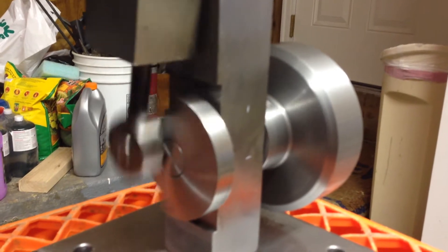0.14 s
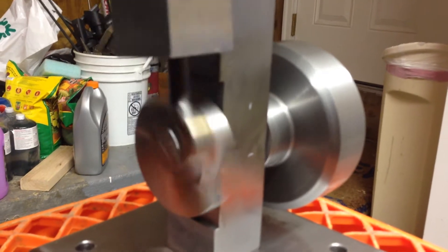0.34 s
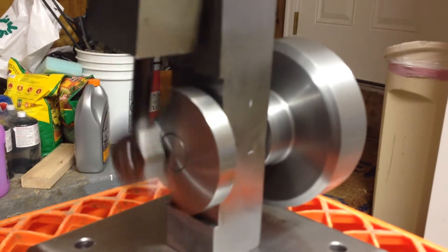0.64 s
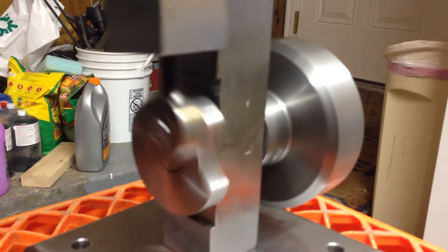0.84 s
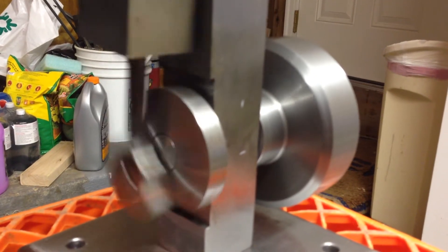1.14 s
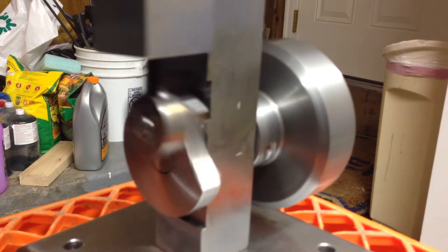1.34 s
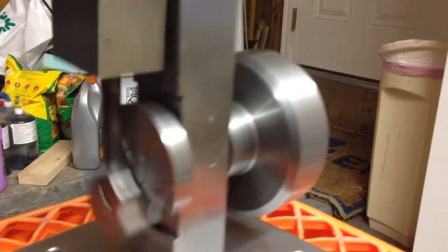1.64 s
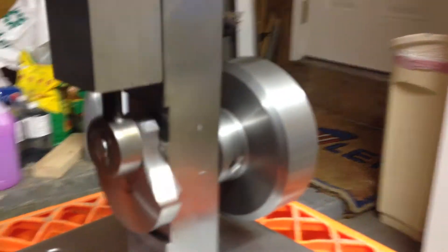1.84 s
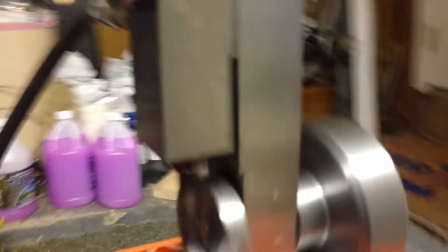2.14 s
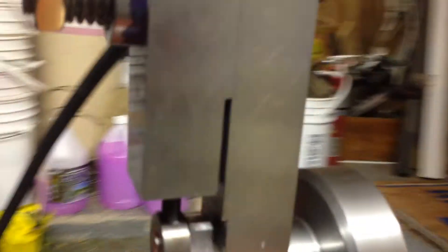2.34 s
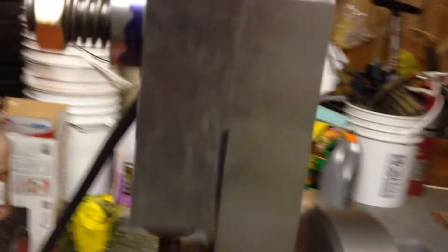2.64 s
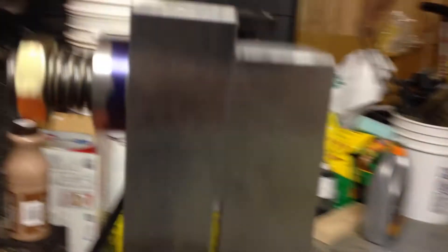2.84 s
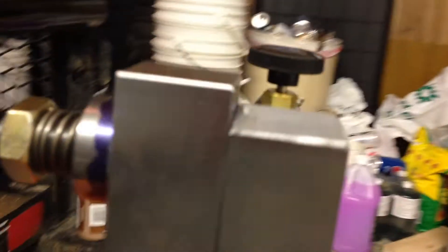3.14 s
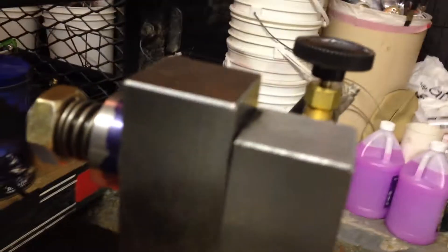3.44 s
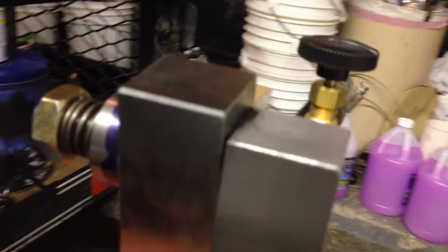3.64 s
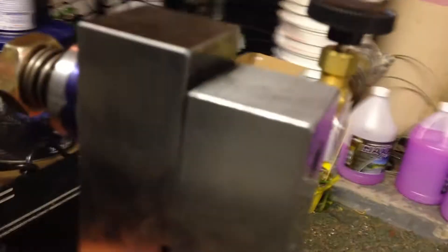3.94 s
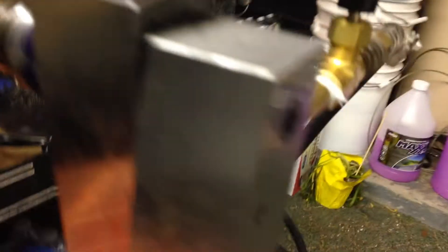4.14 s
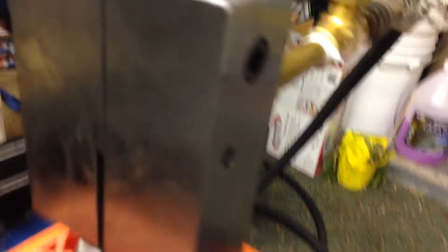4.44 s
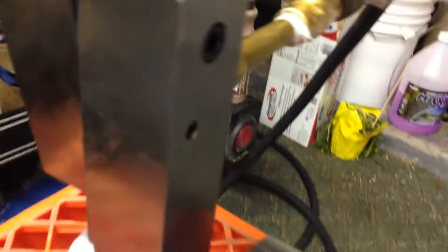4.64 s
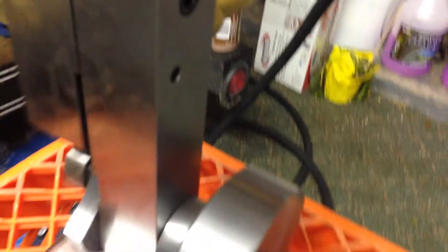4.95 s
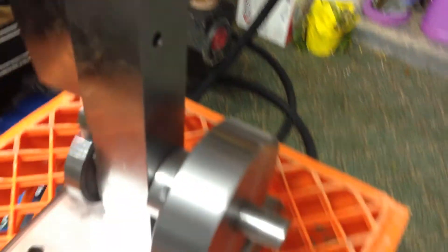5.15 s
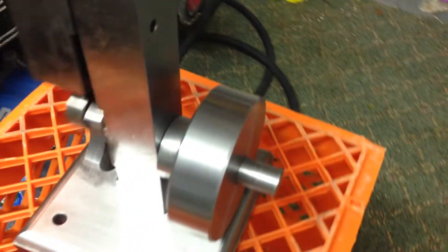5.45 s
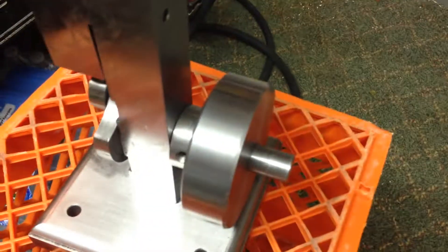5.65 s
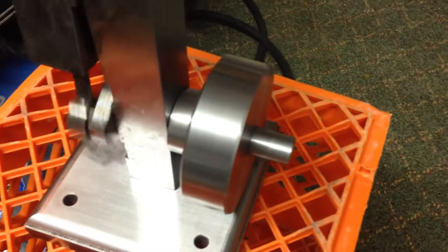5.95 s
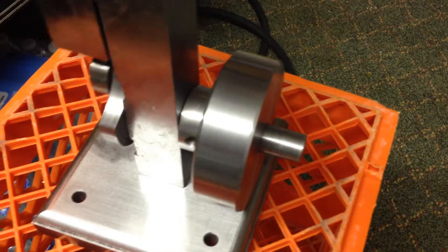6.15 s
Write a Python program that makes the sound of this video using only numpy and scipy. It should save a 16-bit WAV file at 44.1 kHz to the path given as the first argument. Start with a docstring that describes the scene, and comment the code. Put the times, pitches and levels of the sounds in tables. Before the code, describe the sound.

Bright, quick puffs of exhaust come in pairs from a small single-cylinder engine, one crisp and one hissier, about four puffs a second without a break. Its loose bearing ticks and knocks lightly between them. In the second half the pace eases slightly and the metal sounds recede as the close microphone moves around the machine. The workshop adds a brief echo, quiet rumble and a faint hum.

```python
"""Oscillating-cylinder engine idling in a workshop.

About two turns a second, slowing a little and unevenly. Each turn exhausts twice through a narrow
port: a short sharp puff, then a longer hissing one. Play in the crank bearing ticks before the sharp
puff and knocks after it. A close microphone moves around the engine; the shop echoes, rumbles and hums."""
import sys
import numpy as np
from scipy import signal
from scipy.fft import rfft, irfft, next_fast_len
from scipy.io import wavfile
from scipy.ndimage import uniform_filter1d

SR = 44100
rng = np.random.default_rng(int(sys.argv[2]) if len(sys.argv) > 2 else 0)


def generate_wav(signal):
    """Clip the signal to [-1, 1] and save it as 16-bit WAV at the path in sys.argv[1]."""
    frames = np.transpose(np.atleast_2d(signal))
    scaled = np.clip(frames, -1, 1) * 32767
    pcm = np.round(scaled).astype(np.int16)
    wavfile.write(sys.argv[1], SR, pcm)


N = 278251

# crank turns: sharp_start_s, long_start_s, sharp_db, sharp_bright_db, long_db, long_bright_db, clatter_db
CRANK_TURNS = [(-0.191, -0.002, -22, 0, -24.5, 0, -38), (0.2954, 0.4824, -22.5, 0.5, -24.5, 0.5, -35),
               (0.7727, 0.96, -21.5, -2.5, -24.5, 1.3, -38.5), (1.2487, 1.4385, -22, 0, -24.5, 2, -38),
               (1.7356, 1.9256, -21, -2.5, -23, -0.5, -36), (2.2219, 2.4091, -22, -1, -19.5, -4, -35.5),
               (2.702, 2.8922, -22, 1, -19.5, -2.5, -40), (3.1924, 3.3932, -20.5, -0.5, -22.5, 0.8, -39.5),
               (3.7563, 3.9538, -22, 1, -20.5, -0.8, -36), (4.2996, 4.4908, -20.5, 0.5, -24.5, 4.5, -35),
               (4.8081, 5.004, -22.5, 0.5, -24, 0.6, -42), (5.3422, 5.5436, -25, 1.5, -24.5, 2.5, -41),
               (5.9335, 6.1301, -25, 1.1, -23.5, 0, -42)]
# sharp puff duration: time_s, length_s
SHARP_PUFF_LENGTH = [(0, 0.0172), (2.2, 0.02), (3.2, 0.0142), (4.3, 0.0145), (6, 0.018)]
# top treble as the microphone enters the sharp puff's beam: time_s, gain_db
SHARP_BEAM = [(0, -1.6), (2.2, -3), (3.2, -1.5), (4.2, 1.5), (6, 0.2)]
# jet noise: freq_hz, density_db
SHARP_JET_SPECTRUM = [(100, -34.5), (400, -26), (800, -18), (1450, -11), (2150, 0.5), (3000, -3),
                      (5000, -3.5), (8500, -5), (11500, -2.5), (13300, -4.5), (15200, 0.5)]
LONG_JET_SPECTRUM = [(100, -44.5), (400, -22.5), (900, -17.5), (1400, -7.5), (2000, 1.5), (3000, -3),
                     (5000, -0.5), (7500, -3), (9000, -11.5), (11500, -10.5), (13300, -15), (15200, -8.5)]
# odd quarter-wave resonances of the bore: centre_hz, width_hz, lift_db
SHARP_BORE_MODES = [(2184, 760, 6.5), (6460, 1700, 11), (10490, 1700, 11), (14500, 650, 4.5)]
LONG_BORE_MODES = [(2283, 970, 6.73), (6176, 780, 13.05), (10640, 1420, 14.16), (14800, 800, 4)]
# bore resonances as the flow dies: centre_hz, width_hz, level_db
SINGING_MODES = [(2090, 110, -2.5), (6310, 230, -3)]
# frame and crank modes: pitch_hz, t60_s, knock_db, tick_db
METAL_MODES = [(832, 0.11, -16.5, -8.5), (1130, 0.091, -26.5, -9.5), (1316, 0.074, -16.5, -7.5),
               (1640, 0.017, -8, -17), (2540, 0.018, -8.5, -14), (3300, 0.045, -12.5, -12),
               (4460, 0.0047, -5.5, 2.5), (6800, .014, -8.5, -12), (7690, 0.0079, -3, -18)]
# contacts in a knock: delay_s, level_db
KNOCK_CONTACTS = [(0, -1), (.005, -5), (.0095, -9.5)]
# microphone leaving the crank: time_s, gain_db
CRANK_PROXIMITY = [(0, 1), (2.4, -0.5), (3.3, -3.5), (6.31, -6)]
# thin spits, dull bump, soft low thump: start_s, level_db
SPIT_EVENTS = [(0.154, -37), (1.111, -38), (3.7025, -35), (4.205, -39)]
BUMP_EVENTS = [(2.051, -32.5)]
THUMP_EVENTS = [(3.904, -46.5)]
# contact and friction noise: freq_hz, density_db
SNAP_SPECTRUM = [(1000, -28), (3300, -12), (4400, 3.5), (5600, -6), (7000, -1.5), (8400, 0),
                 (9500, -17), (15000, -36)]
KNOCK_SPECTRUM = [(100, -14), (600, 8.5), (1200, 3), (8300, -1), (9500, -18.5), (15000, -28)]
CLATTER_SPECTRUM = [(60, -15), (250, -10), (400, 1), (600, 5.5), (800, -5), (1100, -9.5), (2000, -43.5)]
TICK_SPECTRUM = [(100, -14), (600, 10), (8000, -2.5), (11000, -19.5), (15000, -29)]
SPIT_SPECTRUM = [(2000, -12.5), (7000, 1.5), (10000, 4), (15000, -8)]
BUMP_SPECTRUM = [(60, 7), (600, 12), (1300, 1), (3000, -18), (10000, -45)]
THUMP_SPECTRUM = [(60, -19), (120, -2), (160, -7), (260, -26), (1000, -52)]
RUB_SPECTRUM = [(100, -12.5), (220, -9.5), (450, -9.5), (850, 2.5), (1400, -13.5), (2500, -16.5),
                (10000, -23)]
SHUDDER_SPECTRUM = [(30, -13), (70, -2), (140, -0.5), (240, -5), (500, -8), (2000, -54.5)]
# shop decay: freq_hz, t60_s
SHOP_DECAY = [(200, 0.87), (1300, .42), (2150, 0.46), (3200, 0.41), (5200, 0.35), (6300, 0.41), (7800, .36),
              (10500, 0.3), (15000, 0.24)]
# reverb tail as the microphone moves: time_s, gain_db
REVERB_LEVEL = [(0, -17), (2.5, -20), (3.7, -23.5), (6.31, -25)]
# room rumble: freq_hz, density_db
RUMBLE_SPECTRUM = [(20, -33), (35, -20), (50, -4), (72, 4), (100, -6.5), (220, -0.5), (350, -7.5),
                   (800, -13.5), (1500, -14.5), (5000, -14.5), (15000, -22.5)]
# rumble and hum envelopes: time_s, level_db
RUMBLE_LEVEL = [(0, -71), (1.35, -68.5), (3.2, -68), (3.6, -71.5), (4.7, -74), (5.1, -78), (6.31, -73.5)]
HUM_LEVEL = [(0, -78.5), (1.4, -72.5), (2.5, -75), (4.5, -91.5)]

STROKE_S = 0.19  # sharp puff to long puff, at a brisk pace
LONG_PUFF_S, LONG_PUFF_EXPONENT = 0.029, 3.4  # at STROKE_S; power law in stroke time
KNOCK_DELAY_S, KNOCK_EXPONENT = 0.1035, 0.6  # likewise
TICK_LEAD_S = 0.064
KNOCK_BASE_DB, TICK_BASE_DB = -27, -39.5
RASP_SHARE, WHISTLE_SHARE = 0.87, 0.8  # of brightness, near 4 kHz and 6 kHz
TOP_HZ = 15400


def exhaust(puffs, flow_db, jet, bore, gain_db, flutter_db, bass_fade_db):
    """Each port opening releases a turbulent jet, coloured by the bore."""
    out, t = np.zeros(N), np.arange(-SR // 50, SR // 7) / SR
    hz = np.fft.rfftfreq(len(t), 1 / SR)
    lift_db = sum(db / (1 + (2 * (hz - centre_hz) / width_hz) ** 2) for centre_hz, width_hz, db in bore)
    colour = amp(at_hz(jet, hz) + lift_db)
    colour /= np.sqrt(np.mean(colour ** 2 * (hz < 4500)))
    for start_s, length_s, level_db, bright_db, top_db in puffs:
        # treble beams, so colour follows microphone position
        rasp_db, whistle_db = RASP_SHARE * bright_db, WHISTLE_SHARE * bright_db
        beam_db = at_hz([(2500, 0), (3100, rasp_db), (5000, rasp_db), (5800, whistle_db),
                         (7000, whistle_db), (9500, bright_db + top_db)], hz)
        air = irfft(rfft(rng.standard_normal(len(t))) * colour * amp(beam_db), len(t))
        # bass dies first as pressure falls
        bass = filtered(air, lambda f: 1 / (1 + (f / 1400) ** 6))
        air -= bass * (1 - amp(-bass_fade_db * np.maximum(t / length_s - 0.5, 0)))
        flutter = unit(uniform_filter1d(rng.standard_normal(len(t)), SR // 400))
        envelope = amp(level_db + gain_db + flow_db(t / length_s) + flutter_db * flutter)
        add(out, start_s + t[0], envelope * air)
    return out


def port_flow(rise_db, open_at, exponent, hold_until, fall_db, shut_at, shut_over, shut_db):
    """The port opens, pressure holds and drains, the port shuts to a leak. Time in puff lengths."""
    def flow_db(progress):
        opening = rise_db * np.maximum(open_at - progress, 0) ** exponent
        draining = fall_db * np.maximum(progress - hold_until, 0)
        shutting = shut_db * np.clip((progress - shut_at) / shut_over, 0, 1)
        return -opening - draining - shutting
    return flow_db


def sharp_puffs():
    """Quick-stroke exhausts: start_s, length_s, level_db, bright_db, top_db."""
    return [(start_s, at_time(SHARP_PUFF_LENGTH, start_s), db, bright_db, at_time(SHARP_BEAM, start_s))
            for start_s, _, db, bright_db, *_ in CRANK_TURNS]


def long_puffs():
    """Slow-stroke exhausts, same columns; a slower crank holds the port open longer."""
    return [(long_s, LONG_PUFF_S * ((long_s - sharp_s) / STROKE_S) ** LONG_PUFF_EXPONENT, db, bright_db, 0)
            for sharp_s, long_s, _, _, db, bright_db, _ in CRANK_TURNS]


def bore_singing(puffs, gain_db, peak_at, spread, rise):
    """The bore's lowest resonances swell late in a puff and creep upward. Time in puff lengths."""
    out, t = np.zeros(N), np.arange(SR // 6) / SR
    for start_s, length_s, level_db, *_ in puffs:
        past_peak = t / length_s - peak_at
        swell = amp(level_db + gain_db) * np.exp(-(past_peak / spread) ** 2) * (1 - np.exp(-t / 0.004))
        for hz, width_hz, mode_db in SINGING_MODES:
            drift = slow_noise(width_hz / 2, 2 * len(t)).reshape(2, -1)
            phase = 2 * np.pi * np.cumsum(hz * (1 + rise * past_peak)) / SR
            band = drift[0] * np.cos(phase) + drift[1] * np.sin(phase)
            add(out, start_s, amp(mode_db) * swell * band)
    return out


def knock_events():
    """The bearing takes up its play about midway between puffs: start_s, level_db, clatter_db."""
    return [(sharp_s + KNOCK_DELAY_S * ((long_s - sharp_s) / STROKE_S) ** KNOCK_EXPONENT,
             KNOCK_BASE_DB + at_time(CRANK_PROXIMITY, sharp_s), clatter_db)
            for sharp_s, long_s, *_, clatter_db in CRANK_TURNS]


def bearing_knocks(click_db, crack_db, snap_db, clatter_gain_db):
    """The crank pin lands with a hard snap and bounces twice; the stand clatters."""
    out, t = np.zeros(N), np.arange(SR // 5) / SR
    modes = [(hz, t60_s, db) for hz, t60_s, db, _ in METAL_MODES]
    for start_s, level_db, clatter_db in knock_events():
        snap = noise(SNAP_SPECTRUM, len(t)) * decay(t, t60_s=0.009)
        add(out, start_s, amp(level_db + snap_db) * snap)
        for delay_s, contact_db in KNOCK_CONTACTS:
            crack = amp(crack_db) * noise(KNOCK_SPECTRUM, len(t)) * decay(t, t60_s=0.018)
            click = amp(level_db + contact_db + click_db) * (metal_ring(modes, t) + crack)
            add(out, start_s + delay_s * rng.uniform(0.97, 1.0), click)
        clatter = noise(CLATTER_SPECTRUM, len(t)) * decay(t, t60_s=0.3) * (1 - np.exp(-t / 0.0017))
        add(out, start_s, amp(clatter_db + clatter_gain_db) * clatter)
    return out


def bearing_ticks(click_db, crack_db):
    """Before each sharp puff the play closes the other way, ringing the same metal more softly."""
    out, t = np.zeros(N), np.arange(SR // 4) / SR
    modes = [(hz, t60_s, db) for hz, t60_s, _, db in METAL_MODES]
    for sharp_s, *_ in CRANK_TURNS:
        crack = amp(crack_db) * noise(TICK_SPECTRUM, len(t)) * decay(t, t60_s=0.017)
        level_db = TICK_BASE_DB + at_time(CRANK_PROXIMITY, sharp_s) + click_db
        add(out, sharp_s - TICK_LEAD_S, amp(level_db) * (metal_ring(modes, t) + crack))
    return out


def metal_ring(modes, t):
    """Damped modes; random pitch and strength stand for the crank's position at each contact."""
    out = np.zeros(len(t))
    for hz, t60_s, level_db in modes:
        envelope = amp(level_db + rng.normal(0, 2)) * decay(t, t60_s)
        pitch_hz = hz * (1 + rng.normal(0, 0.025))
        out += envelope * np.sin(2 * np.pi * pitch_hz * t)
    return out


def hollow_ring(gain_db, start_hz, end_hz, glide_s, t60_s, attack_s):
    """Each knock wakes a rising hollow tone, as in a cylinder whose air space shrinks."""
    out, t = np.zeros(N), np.arange(SR // 5) / SR
    for start_s, _, clatter_db in knock_events():
        hz = (end_hz + (start_hz - end_hz) * np.exp(-t / glide_s)) * (1 + rng.normal(0, 0.02))
        tone = np.sin(2 * np.pi * np.cumsum(hz) / SR)
        envelope = (1 - np.exp(-t / attack_s)) ** 2 * decay(t, t60_s)
        add(out, start_s, amp(clatter_db + gain_db) * envelope * tone)
    return out


def small_contacts(events, spectrum, t60_s, gain_db):
    """Contacts without a ring: decaying noise bursts."""
    out, t = np.zeros(N), np.arange(SR // 10) / SR
    for start_s, level_db in events:
        add(out, start_s, amp(level_db + gain_db) * decay(t, t60_s) * noise(spectrum, len(t)))
    return out


def port_face_rub(level_db, lead_s, width_s):
    """The cylinder rubs its port face, most on the fast swing through the sharp puff."""
    t = np.arange(N) / SR
    speed = sum(np.exp(-((t - sharp_s + lead_s) / width_s) ** 2) for sharp_s, *_ in CRANK_TURNS)
    return amp(level_db + curve(CRANK_PROXIMITY)) * speed * noise(RUB_SPECTRUM, N)


def crate_shudder(level_db, delay_s, t60_s):
    """Piston reversal shakes the crate just after each sharp puff."""
    out, t = np.zeros(N), np.arange(SR // 4) / SR
    envelope = amp(level_db) * decay(t, t60_s) * (1 - np.exp(-t / 0.0062))
    for sharp_s, *_ in CRANK_TURNS:
        add(out, sharp_s + delay_s, envelope * noise(SHUDDER_SPECTRUM, len(t)))
    return out


def shop_echoes(x, near_db, wall_db):
    """Early echoes off steel and clutter, then the room's tail; paths change as the microphone moves."""
    out, wet, block = np.zeros(N), amp(curve(REVERB_LEVEL)), SR // 4
    for start in range(0, N, block):
        hz, t, bins = signal.stft(rng.standard_normal(SR // 2), SR, nperseg=256)
        envelope = decay(t, at_hz(SHOP_DECAY, hz)[:, None]) * (1 - np.exp(-t / 0.0064))
        tail = signal.istft(bins * envelope, SR, nperseg=256)[1]
        response = wet[start] * tail / np.linalg.norm(tail)
        for first_s, last_s, echo_db in ((0.0008, 0.005, near_db), (0.006, 0.028, wall_db)):
            taps = (rng.uniform(first_s, last_s, size=3) * SR).astype(int)
            response[taps] += amp(echo_db) * rng.choice([-1, 1], size=3)
        add(out, start / SR, signal.fftconvolve(x[start:start + block], response))
    return out


def shop_rumble(gain_db):
    """Quiet, low room noise."""
    return amp(curve(RUMBLE_LEVEL) + gain_db) * noise(RUMBLE_SPECTRUM, N)


def shop_hum(pitch_hz, gain_db):
    """A faint, unsteady tone."""
    phase = 2 * np.pi * pitch_hz * np.arange(N) / SR + 0.6 * slow_noise(cutoff_hz=4, size=N)
    return amp(curve(HUM_LEVEL) + gain_db) * np.sin(phase)


def amp(db):
    """Decibels to gain."""
    return 10 ** (np.asarray(db) / 20)


def decay(t, t60_s):
    """Gain falling 60 dB in t60_s."""
    return amp(-60 * t / t60_s)


def unit(x):
    """Scale to rms 1."""
    return x / np.sqrt(np.mean(x ** 2) + 1e-20)


def at_hz(rows, hz):
    """Interpolate (freq_hz, value) rows on a log axis."""
    freq_hz, values = np.transpose(rows)
    return np.interp(np.log(hz + 1), np.log(freq_hz), values)


def at_time(rows, time_s):
    """Interpolate (time_s, value) rows."""
    return np.interp(time_s, *np.transpose(rows))


def curve(rows):
    """(time_s, value) rows at every sample."""
    return at_time(rows, np.arange(N) / SR)


def filtered(x, response):
    """Apply a frequency response."""
    size = next_fast_len(len(x) + SR // 10)
    return irfft(rfft(x, size) * response(np.fft.rfftfreq(size, 1 / SR)), size)[:len(x)]


def noise(spectrum, size):
    """Coloured noise, rms 1."""
    return unit(filtered(rng.standard_normal(size), lambda hz: amp(at_hz(spectrum, hz))))


def slow_noise(cutoff_hz, size):
    """Low-passed noise, rms 1."""
    return unit(filtered(rng.standard_normal(size), lambda hz: 1 / (1 + (hz / cutoff_hz) ** 4)))


def add(track, start_s, sound):
    """Mix in a sound, cropped to the track."""
    start = round(start_s * SR)
    sound = sound[max(-start, 0):max(N - start, 0)]
    track[max(start, 0):][:len(sound)] += sound


def scene():
    """Engine, echoes and room noise, mono."""
    sharp_flow = port_flow(rise_db=58, open_at=0.46, exponent=2.03, hold_until=0.56, fall_db=12.5,
                           shut_at=0.88, shut_over=0.35, shut_db=10)
    long_flow = port_flow(rise_db=84.5, open_at=0.44, exponent=2.78, hold_until=0.43, fall_db=13.5,
                          shut_at=1.32, shut_over=0.7, shut_db=6)
    engine = exhaust(sharp_puffs(), sharp_flow, SHARP_JET_SPECTRUM, SHARP_BORE_MODES,
                     gain_db=-0.02, flutter_db=0.9, bass_fade_db=2.2)
    engine += exhaust(long_puffs(), long_flow, LONG_JET_SPECTRUM, LONG_BORE_MODES,
                      gain_db=0.37, flutter_db=1.24, bass_fade_db=5.5)
    engine += bore_singing(long_puffs(), gain_db=-10.5, peak_at=1.3, spread=0.64, rise=0.02)
    engine += bore_singing(sharp_puffs(), gain_db=-11, peak_at=0.7, spread=0.28, rise=0.016)
    engine += bearing_knocks(click_db=-6, crack_db=-1.5, snap_db=-1.5, clatter_gain_db=-11.5)
    engine += bearing_ticks(click_db=-4, crack_db=-3)
    engine += hollow_ring(gain_db=13.5, start_hz=446, end_hz=530,
                          glide_s=0.023, t60_s=0.051, attack_s=0.0049)
    engine += small_contacts(SPIT_EVENTS, SPIT_SPECTRUM, t60_s=0.0069, gain_db=-3.5)
    engine += small_contacts(BUMP_EVENTS, BUMP_SPECTRUM, t60_s=0.027, gain_db=-8)
    engine += small_contacts(THUMP_EVENTS, THUMP_SPECTRUM, t60_s=0.13, gain_db=-4)
    engine += port_face_rub(level_db=-59, lead_s=0.0046, width_s=0.075)
    engine += crate_shudder(level_db=-50, delay_s=0.016, t60_s=0.13)
    room = shop_rumble(gain_db=5.5) + shop_hum(pitch_hz=123.5, gain_db=4)
    return (engine + shop_echoes(engine, near_db=-11.5, wall_db=-22) + room)[None]


def record(dry):
    """Steep low-pass at TOP_HZ."""
    return filtered(dry[0], lambda hz: 1 / np.sqrt(1 + (hz / TOP_HZ) ** 200))[None]


dry = scene()
out = record(dry)
generate_wav(out)
```